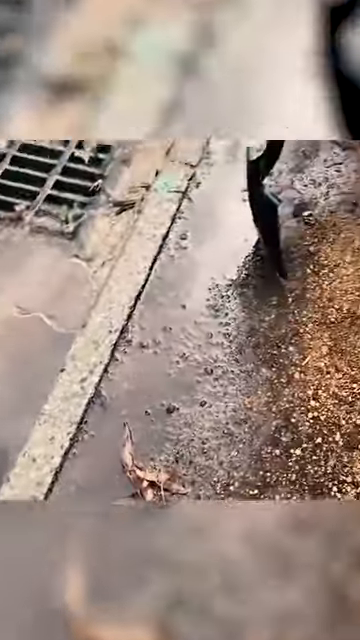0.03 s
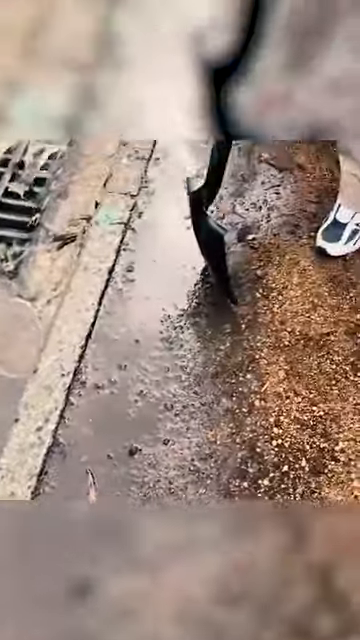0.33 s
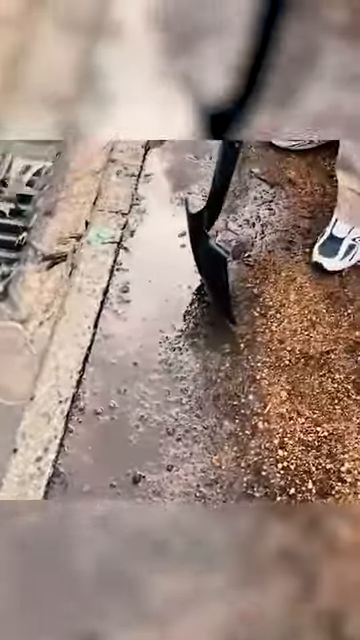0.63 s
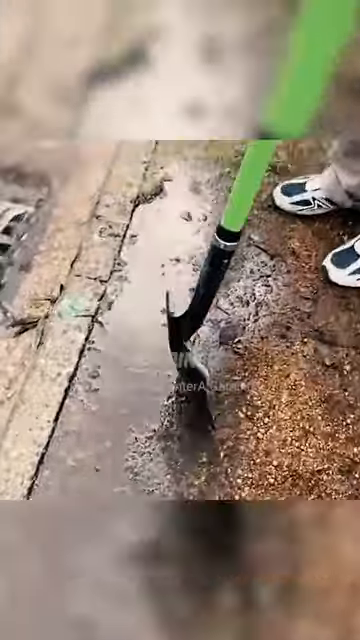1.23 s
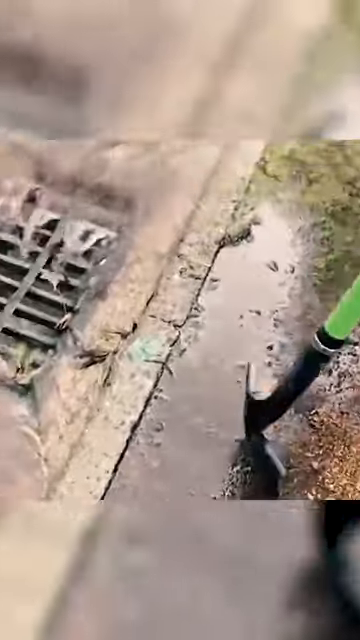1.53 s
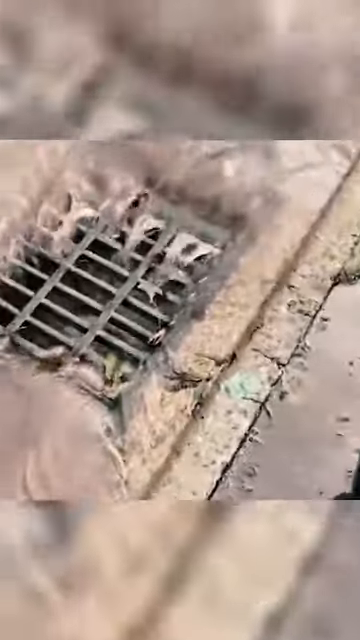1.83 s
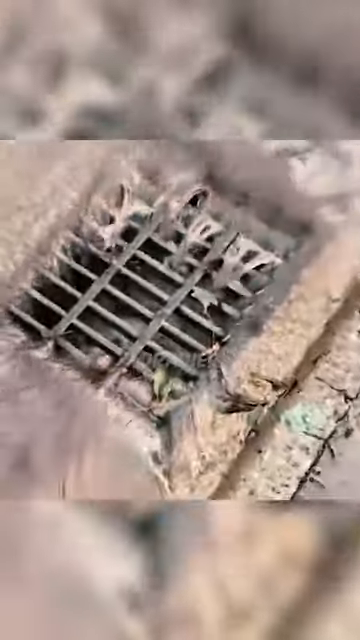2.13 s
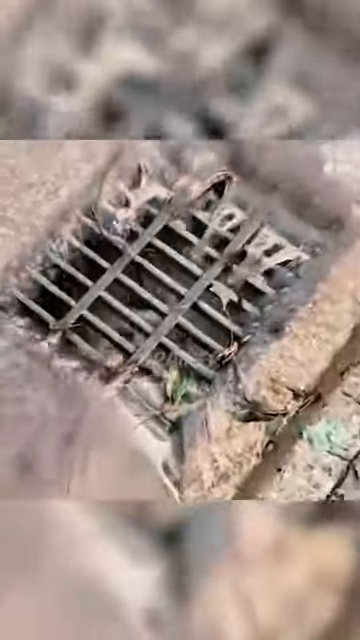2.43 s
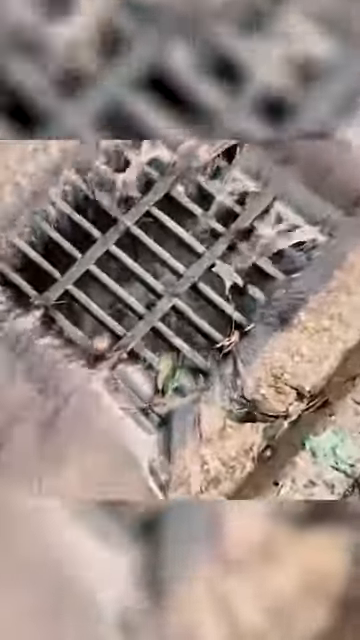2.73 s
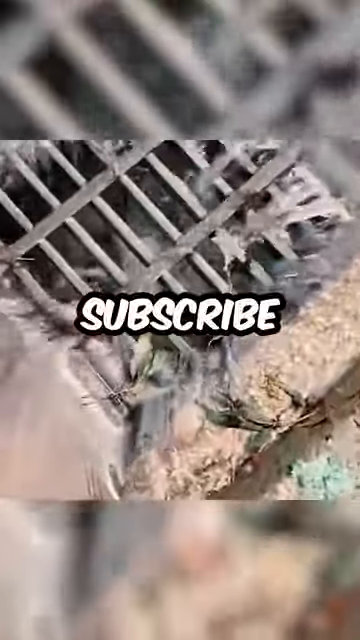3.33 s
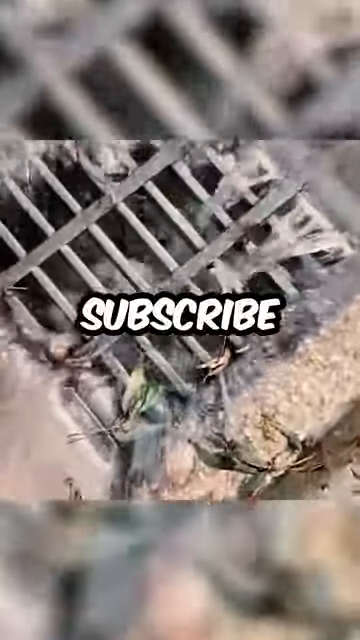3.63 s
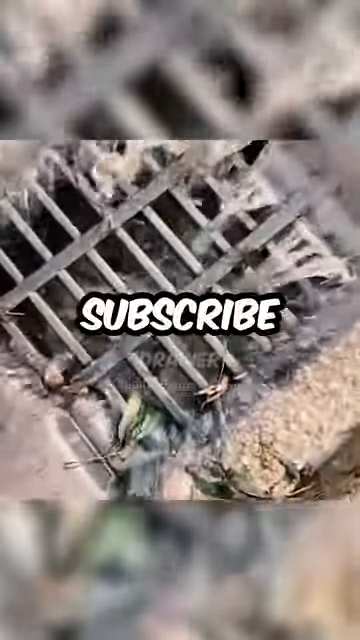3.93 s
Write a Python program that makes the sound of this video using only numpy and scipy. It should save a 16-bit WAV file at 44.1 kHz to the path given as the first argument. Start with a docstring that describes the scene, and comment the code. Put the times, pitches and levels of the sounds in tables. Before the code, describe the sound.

Water pours into a street drain throughout, a dense rush of low rumble, gurgling and fine spray. At about 0.7 seconds a shovel scrapes softly through wet grit with a dull bump, and low buffeting gives way to a faint hum. From around 2 seconds the splashing grows brighter and louder as the microphone moves over the grate, with hollow glugs, most frequent between 2.5 and 3.5 seconds.

```python
"""Rumbling, gurgling water pours through a street drain, its splashing brightening as the shaft opens up.
Big air pockets boom in the shaft, shorter bubbles ring in the pool, and fine spray fizzes on top.
The microphone is carried from the kerb to just above the grate, so the wall echo shifts and the shaft's
resonances glide. Early on a shovel scrapes, and with a soft bump low buffeting gives way to a hum."""
import sys
import numpy as np
from scipy import signal
from scipy.fft import rfft, irfft, next_fast_len
from scipy.io import wavfile
from scipy.ndimage import uniform_filter1d, map_coordinates

SR = 44100
rng = np.random.default_rng(int(sys.argv[2]) if len(sys.argv) > 2 else 0)


def inscribe(sig):
    """Save sig as 16-bit PCM at rate SR to the path in sys.argv[1].

    A 1-D sig is mono; a 2-D sig holds one channel per row.
    Samples are clipped to [-1, 1] before scaling.
    """
    pcm = np.round(np.clip(np.atleast_2d(sig).T, -1, 1) * 32767)
    wavfile.write(sys.argv[1], SR, pcm.astype(np.int16))


N = 176400

# Fader rides for the three water layers. Each row: time in seconds, level in dB before any trim.
RUMBLE_FADER = [(0, -46), (.45, -48), (.9, -43.5), (1.7, -42), (2.2, -42.5), (2.75, -41.5), (3.2, -42),
                (3.5, -42), (4, -41.5)]
GURGLE_FADER = [(0.0, -42.5), (0.2, -43), (2.19, -47.5), (2.53, -44.5), (2.95, -43.5), (3.13, -41),
                (3.3, -41), (3.39, -37.5), (3.97, -39), (4.0, -38.5)]
SPLASH_FADER = [(0, -48), (0.53, -48), (1.14, -47.5), (2, -42), (2.6, -39.5), (3.27, -40), (3.65, -37.5),
                (4, -38)]
# Tone of the shaft's rumble and the pool's gurgle. Each row: frequency in Hz, gain in dB.
RUMBLE_EQ = [(22, -52), (45, -7.5), (80, -3), (115, -0.5), (160, 0), (200, 2.4), (280, -0.3), (400, -6.5),
             (520, -14.5), (900, -28)]
GURGLE_EQ = [(300, -25), (520, 1), (700, -2), (900, -4), (1200, -1.5), (1500, -1), (1900, -10.5),
             (2800, -14), (6000, -63)]
# Tone of the splashing. Each row: frequency in Hz, gain in dB from the kerb, then above the grate.
SPLASH_EQ = [(398, -17, -17), (1440, 4, -3), (2070, 3.2, 4), (3020, 5, .5), (4200, 2.3, 2),
             (5200, -1.5, -3), (5800, 3, -1.5), (6500, 3, -.7), (7700, -.7, 1.7), (8300, 4.5, 3),
             (9000, 1.5, 2), (9900, -.7, 0.7), (12200, -.5, -2.5), (15700, -1.8, -5.2)]
# Single large bubbles in the pool. Each row: start in seconds, pitch in Hz, level in dB.
GLUG_CUES = [(1.12, 336, -25.5), (1.495, 224, -27.5), (1.85, 250, -32), (2.5, 1245, -21), (2.641, 118, -30),
             (2.844, 201.4, -26), (3.032, 920, -22), (3.129, 1460, -23), (3.374, 240, -24),
             (3.438, 1300, -23), (3.446, 207, -29), (3.545, 1190, -43), (3.964, 208, -27)]
# Drops bursting nearby. Each row: start in seconds, level in dB before trim and EQ.
DROP_CUES = [(0.2624, -33), (1.657, -29), (3.528, -27.5)]
# Tone of a drop. Each row: frequency in Hz, gain in dB.
DROP_EQ = [(1000, -30), (3000, 8), (8000, 2), (16000, -6)]
# Echo off the shaft wall. Each row: time in seconds, delay in milliseconds, strength from 0 to 1.
WALL_ECHO = [(0, 0.89, 0.37), (.7, 0.76, 0.4), (1.1, .8, 0.13), (1.45, 0.8, 0), (2, 0.51, 0.1),
             (2.5, 0.82, 0.29), (3.1, 1.31, 0.18), (3.45, 0.9, 0.16), (4, 1.1, 0)]
# Four shaft resonances that glide as the microphone passes over the grate.
# Each row: time in seconds, centre in Hz, boost in dB.
BASS_GLIDE = [(0, 377, 4), (1.2, 376, 7.5), (1.9, 410, 5.5), (2.4, 425, 12), (2.9, 338, 3), (3.5, 203, 2.5),
              (4, 192, 6)]
LOW_GLIDE = [(0, 1350, -0.5), (1, 1210, 3), (2.1, 1140, 7.5), (2.55, 1030, 8), (3.05, 920, 6.5),
             (3.4, 880, -3), (3.8, 610, -0.5), (4, 634, -2)]
HIGH_GLIDE = [(0, 1910, 2), (.5, 2020, -1.5), (1, 2280, -6), (1.3, 2030, -15), (1.7, 2000, 8.5),
              (2.1, 1950, 7), (2.4, 1650, 9), (2.85, 1320, -5), (3.4, 1340, 5.5)]
TOP_GLIDE = [(0, 2300, -8), (.5, 2500, 4), (.8, 2770, 8), (1.1, 3100, 1), (1.3, 2540, 5), (2.4, 2300, 0.5),
             (2.7, 2050, 3), (3, 2030, 2), (3.4, 2190, 4), (4, 2010, -2)]
# Half width of each resonance, bass to top, as a share of its pitch.
RESONANCE_WIDTHS = [0.082, 0.19, 0.044, 0.027]
# Stereo image at the two microphone ports. Each row: frequency in Hz, left lead in radians from the kerb,
# then above the grate, left minus right in dB, likeness from 0 to 1 from the kerb, then above the grate.
PORT_IMAGE = [(60, -.1, -.1, 1.8, .93, .93), (200, -.2, -.2, 2, .96, .97), (380, -.8, -.9, 5, .93, .93),
              (700, -1.4, -1.75, .5, .9, .88), (1100, -.7, -.75, -3.5, .88, .8), (1550, -.4, 0, -3, .8, .8),
              (2300, 3.1, .7, -1, .75, .62), (3000, 3.5, .9, 0, .58, .35), (4200, 2.7, 1.35, -1, .55, .69),
              (4700, 3.1, 2.2, 0, .8, .62), (5200, 3.14, 3.1, 0, .997, .98),
              (5750, 3.14, 3.18, 0, .99, .975), (6500, 4, 4.2, .5, .8, .68), (7470, 5.2, 5.2, 0, .64, .78),
              (8300, 6.28, 6.28, 0, .99, .99), (10000, 7.5, 7.5, 0, .7, .75), (11000, 9, 9, 0, .82, .84),
              (11700, 9.42, 9.42, 0, .99, .99), (13200, 10.6, 10.6, 0, .74, .7),
              (15000, 12.6, 12.6, 0, .97, .97)]
# Tone of the shovel's drag and of the stone it catches. Each row: frequency in Hz, gain in dB.
SCRAPE_EQ = [(1200, -12), (2900, -7), (4300, -14), (6000, -3), (8000, -16), (16000, -14)]
STONE_EQ = [(3500, -25), (6000, 0), (8000, -8), (11000, -19), (16000, -22)]
# The bump's two pulses. Each row: centre in seconds, pitch in Hz, peak in dB, half length in seconds.
BUMP_CUES = [(.701, 167, -31.5, 0.0073), (.722, 52.3, -37, 0.021)]
# Tone of the buffeting on the ports. Each row: frequency in Hz, gain in dB.
BUFFET_EQ = [(20, -20), (45, 1), (65, 3), (110, -8), (200, -17), (320, -15), (600, -47)]

VIEW_OPENS_S, VIEW_SPAN_S = 1.78, 0.14  # when and how fast the inside of the shaft comes into view
HANDOVER_S, HANDOVER_SPAN_S = 0.73, .03  # when and how fast buffeting gives way to hum
TIME_S = np.arange(N) / SR


def rumble():
    """The falling stream drags big pockets of air under in the shaft."""
    big = lambda: bubbles(low_hz=109.9, high_hz=448, cycles=30, rise=.052, spread_db=2,
                          count=400, size=8000)
    flow = water(big, grain_db=-21.5, flutter_db=-1, flutter_rate=8.5)
    return unit(coloured(flow, RUMBLE_EQ)) * amp(curves(RUMBLE_FADER)[0])


def gurgle(trim_db=-0.4):
    """Many short bubbles ring in the pool under the grate."""
    middling = lambda: bubbles(low_hz=646, high_hz=2132, cycles=58, rise=.07, spread_db=.5,
                               count=1600, size=2600)
    flow = water(middling, grain_db=-10, flutter_db=2.8, flutter_rate=26)
    return unit(coloured(flow, GURGLE_EQ)) * amp(trim_db + curves(GURGLE_FADER)[0])


def splash(trim_db=6):
    """Small bubbles and fine spray, changing colour as the shaft comes into view."""
    small = lambda: bubbles(low_hz=1708, high_hz=5940, cycles=142, rise=.094, spread_db=1,
                            count=1800, size=1700)
    spray = lambda: bubbles(low_hz=3760, high_hz=16700, cycles=9.5, rise=.046, spread_db=2,
                            count=11000, size=200)
    flow = water(lambda: spray() + amp(-5.5) * small(), grain_db=-8, flutter_db=1, flutter_rate=130)

    def colour(hz, view, spectra):
        """Crossfade from the kerb EQ to the grate EQ and roll off the lows."""
        kerb_db, grate_db = along(SPLASH_EQ, hz)
        low_cut = hz / np.hypot(hz, SPLASH_EQ[0][0])
        return spectra * shimmer(hz, spectra) * amp(kerb_db + view * (grate_db - kerb_db)) * low_cut
    return unit(moving(flow, colour)) * amp(trim_db + curves(SPLASH_FADER)[0])


def shimmer(hz, spectra, depth_db=2.5, width_hz=448, smooth_above_hz=6000):
    """Random patches of gain, so that each splash lights up its own part of the spectrum."""
    knots = uniform_filter1d(rng.standard_normal(spectra.shape), size=3, axis=-1)
    band, frame = np.meshgrid(hz.ravel() / width_hz, np.arange(spectra.shape[-1]), indexing="ij")
    patches = unit(np.array([map_coordinates(k, [band, frame], order=1) for k in knots]))
    return amp(patches * depth_db / np.hypot(1, (hz / smooth_above_hz) ** 2))


def water(grains, grain_db, flutter_db, flutter_rate):
    """Two unrelated streams, direct and scattered, of grains on a fluttering wash of noise."""
    wash = rng.standard_normal((2, N)) * amp(flutter_db * wobble(flutter_rate))
    return wash + amp(grain_db) * np.array([grains(), grains()])


def bubbles(low_hz, high_hz, cycles, rise, spread_db, count, size):
    """A cloud of bubbles: damped, rising sines of random time, pitch and strength, size samples each."""
    when, pitch, strength, life = rng.random((count, 4)).T[:, :, None]
    hz = low_hz * (high_hz / low_hz) ** pitch
    turns = hz * np.arange(size) / SR
    age = turns / (cycles * (.5 + life))  # 1 when the ring is 60 dB down
    gain = amp(-spread_db * np.log(1 - .99 * strength)) * np.sqrt(hz)
    polarity = rng.choice([-1, 1], (count, 1))
    rings = gain * polarity * amp(-60 * age) * chirp(turns, age, rise)
    positions = (when * N).astype(int) + np.arange(size)
    return unit(np.bincount(positions.ravel(), rings.ravel(), N + size)[:N])


def glugs(attack_cycles=3.5, ring_cycles=31.3, rise=.03):
    """Each large bubble swells, rings and rises a little in pitch."""
    out, t = np.zeros(N + SR), np.arange(SR // 4) / SR
    for start_s, hz, db in GLUG_CUES:
        turns = hz * t
        age = turns / ring_cycles
        envelope = (1 - np.exp(-turns / attack_cycles)) * amp(db - 60 * age)
        out[round(start_s * SR):][:len(t)] += envelope * chirp(turns, age, rise)
    return out[:N]


def drops(trim_db=3, t60_s=.01):
    """Drops burst nearby: sharp little ticks of noise over the wash."""
    out, t = np.zeros(N + SR), np.arange(SR // 20) / SR
    for start_s, db in DROP_CUES:
        envelope = amp(db + trim_db - 60 * t / t60_s)
        out[round(start_s * SR):][:len(t)] += envelope * rng.standard_normal(len(t))
    return coloured(out[:N], DROP_EQ)


def wall_echo(x, cutoff_hz=2600):
    """The shaft wall adds a dull, close echo whose delay shifts as the microphone moves."""
    delay_ms, strength = curves(WALL_ECHO)
    dull = filtered(x, lambda hz: 1 / (1 + (hz / cutoff_hz) ** 4))
    echo = np.array([np.interp(TIME_S - delay_ms / 1000, TIME_S, stream) for stream in dull])
    return x + strength * echo


def shaft_resonances(hz, view, spectra):
    """The shaft sweeps peaks and dips through the direct stream; the scattered stream stays even."""
    t = np.linspace(0, N / SR, spectra.shape[-1])
    direct, scattered = spectra
    for glide, width in zip((BASS_GLIDE, LOW_GLIDE, HIGH_GLIDE, TOP_GLIDE), RESONANCE_WIDTHS):
        times_s, centre_hz, boost_db = np.transpose(glide)
        detune = np.log((hz + 1) / np.interp(t, times_s, centre_hz)) / width
        direct = direct * amp(np.interp(t, times_s, boost_db) / (1 + detune ** 2))
    return np.array([direct, scattered])


def microphone_ports(hz, view, spectra):
    """The direct stream reaches both ports, one after the other; the scattered one makes them differ."""
    kerb_lead, grate_lead, balance_db, kerb_alike, grate_alike = along(PORT_IMAGE, hz)
    likeness = np.clip(kerb_alike + view * (grate_alike - kerb_alike), 0, 1)
    width = np.arccos(likeness) / 2
    mid, side = np.cos(width) * spectra[0], np.sin(width) * spectra[1]
    lead = kerb_lead + view * (grate_lead - kerb_lead)
    lean = amp(balance_db / 2) * np.exp(.5j * lead)
    return np.array([(mid + side) * lean, (mid - side) / lean])


def shovel():
    """The blade drags softly through wet grit."""
    return grit(SCRAPE_EQ) * amp(-39) * swell(centre_s=.71, half_s=.06)


def stone(level_db=-39, pan_db=3):
    """One small stone ticks against the blade, a little to the left."""
    tick = grit(STONE_EQ) * swell(centre_s=.7092, half_s=.002)
    return tick * amp([[level_db + pan_db], [level_db - pan_db]])


def grit(eq):
    """Rough noise, as of wet gravel under steel."""
    return unit(coloured(rng.standard_normal(N) * amp(3.8 * wobble(400)), eq))


def bump():
    """A dull knock and the deep thud after it, perhaps a hand on the microphone."""
    return sum(amp(db) * swell(centre_s, half_s) * np.cos(2 * np.pi * hz * (TIME_S - centre_s))
               for centre_s, hz, db, half_s in BUMP_CUES)


def buffet(level_db=-42.5, mid_db=-27, duck_db=-14.5):
    """Wide, low buffeting, nearly opposite in the two ports, that falls away at the bump."""
    mid, side = unit(coloured(rng.standard_normal((2, N)), BUFFET_EQ))
    mid = mid * amp(mid_db)
    return np.array([mid + side, mid - side]) * amp(level_db + duck_db * handover())


def hum(pitch_hz=61.4, before_db=-9, octave_peak_s=2.7, octave_db_per_s=6.5):
    """A low hum, perhaps a distant motor, comes up at the bump; its wavering octave swells and fades."""
    phase = 2 * np.pi * pitch_hz * TIME_S
    octave_db = -48.5 - octave_db_per_s * abs(TIME_S - octave_peak_s) + 2 * wobble(5.4)
    fundamental = amp(-47 + .27 * wobble(5.4)) * np.sin(phase)
    octave = amp(octave_db) * np.sin(2 * phase + .29 * wobble(5))
    fader = amp(before_db * (1 - handover()))
    return np.sqrt(2) * (fundamental + octave) * fader * amp([[.8], [-.8]])


def handover():
    """A smooth step from 0 to 1 at the bump."""
    return .5 + .5 * np.tanh((TIME_S - HANDOVER_S) / HANDOVER_SPAN_S)


def swell(centre_s, half_s):
    """A bell-shaped fade in and out."""
    return np.exp(-((TIME_S - centre_s) / half_s) ** 2)


def chirp(turns, age, rise):
    """A bubble's sine, its pitch up by the share rise at age 1."""
    return np.sin(2 * np.pi * turns * (1 + rise * np.minimum(age, 2) / 2))


def amp(db):
    """Decibels to gain."""
    return 10 ** (np.asarray(db) / 20)


def unit(x):
    """x at rms 1."""
    return x / np.sqrt(np.mean(x ** 2) + 1e-20)


def along(rows, hz):
    """Each column after the frequency, read on a log frequency axis."""
    row_hz, *columns = np.transpose(rows)
    return [np.interp(np.log(hz + 1), np.log(row_hz + 1), column) for column in columns]


def curves(rows):
    """One value per sample for each column after the time."""
    times_s, *columns = np.transpose(rows)
    return [np.interp(TIME_S, times_s, column) for column in columns]


def wobble(rate):
    """A smooth random curve, rate knots a second."""
    return map_coordinates(rng.standard_normal(1024), [TIME_S * rate], mode="wrap")


def filtered(x, response):
    """x through a frequency response."""
    size = next_fast_len(N + SR // 2)
    return irfft(rfft(x, size) * response(np.fft.rfftfreq(size, 1 / SR)), size)[..., :N]


def coloured(x, eq):
    """x through an EQ table."""
    return filtered(x, lambda hz: amp(along(eq, hz)[0]))


def moving(x, change):
    """Apply change(hz, view, spectra), where view runs from 0 at the kerb to 1 above the grate."""
    hz, t, spectra = signal.stft(x, SR, nperseg=1024)
    view = .5 + .5 * np.tanh((t - VIEW_OPENS_S) / VIEW_SPAN_S)
    return signal.istft(change(hz[:, None], view, spectra), SR)[1][..., :N]


def scene():
    """The drain and the shovel as the two ports hear them, over the hum and the buffeting."""
    streams = moving(wall_echo(gurgle() + splash() + rumble()), shaft_resonances)
    streams[0] += drops() + glugs() + shovel()  # direct stream only
    return moving(streams, microphone_ports) + stone() + hum() + bump() + buffet()


def record(dry):
    """A brick-wall high cut takes off the very top."""
    return filtered(dry, lambda hz: hz < 15870)


dry = scene()
out = record(dry)
inscribe(out)
```